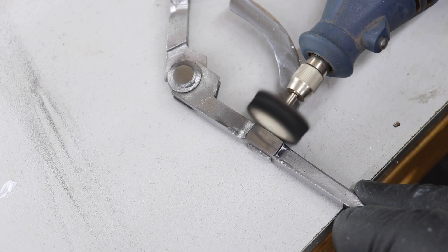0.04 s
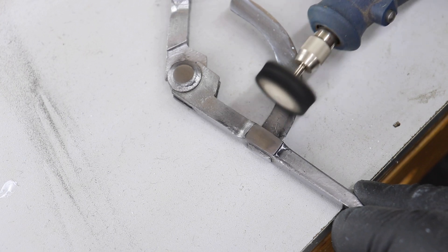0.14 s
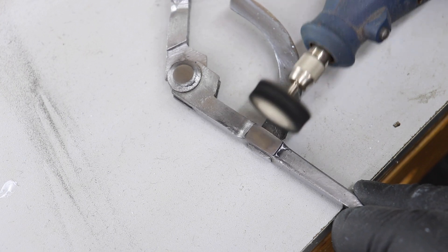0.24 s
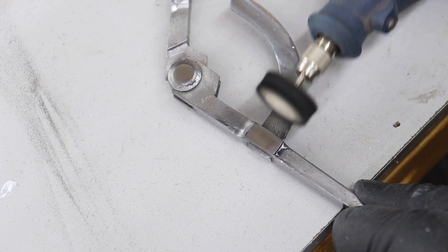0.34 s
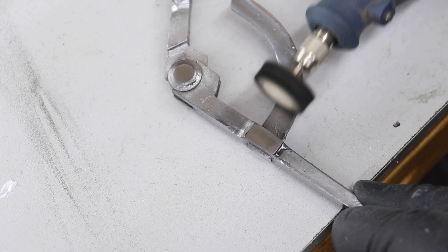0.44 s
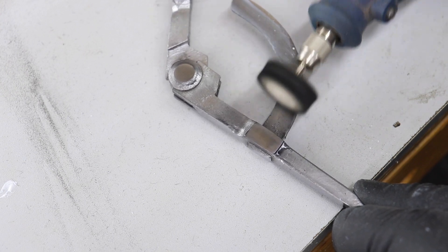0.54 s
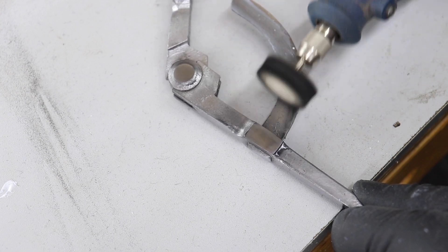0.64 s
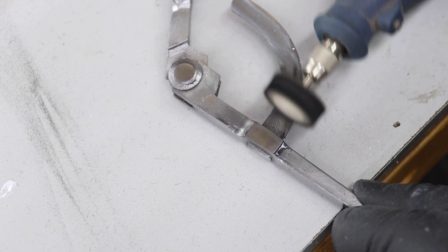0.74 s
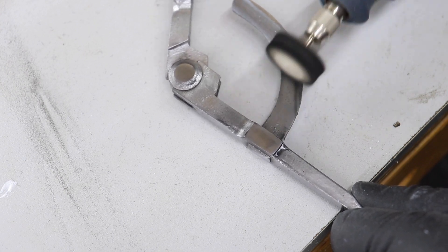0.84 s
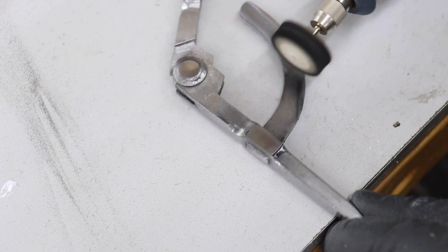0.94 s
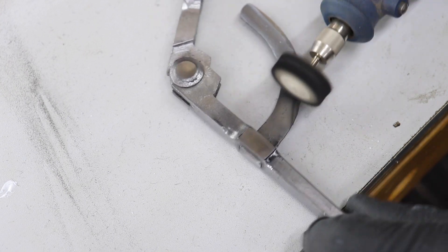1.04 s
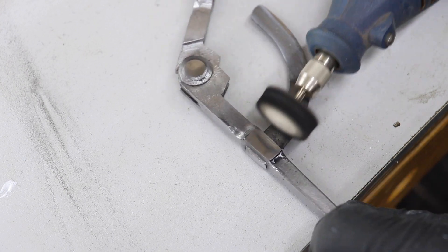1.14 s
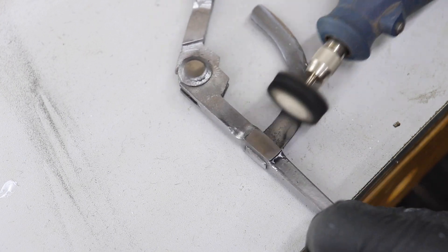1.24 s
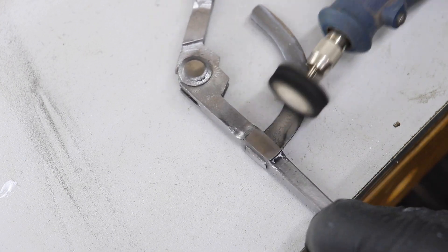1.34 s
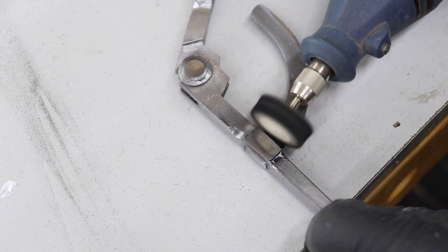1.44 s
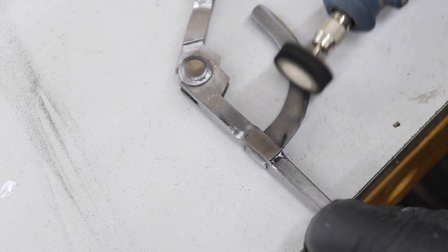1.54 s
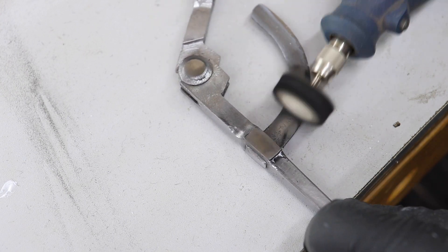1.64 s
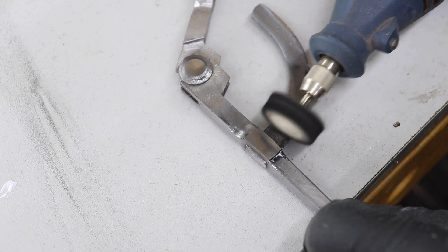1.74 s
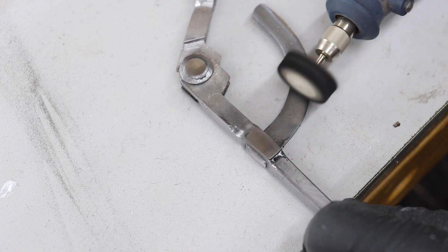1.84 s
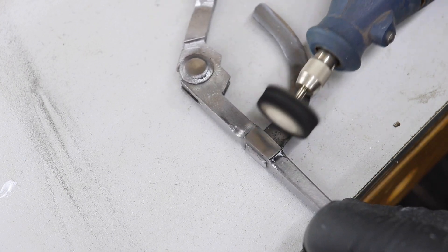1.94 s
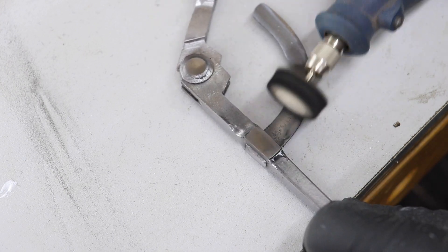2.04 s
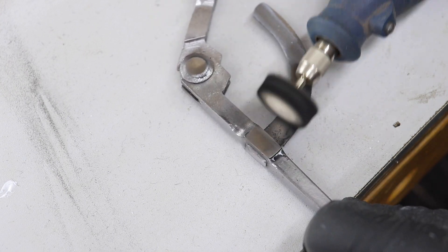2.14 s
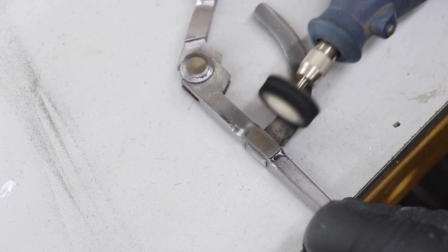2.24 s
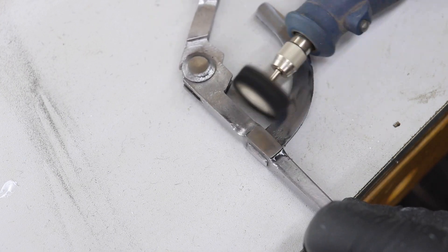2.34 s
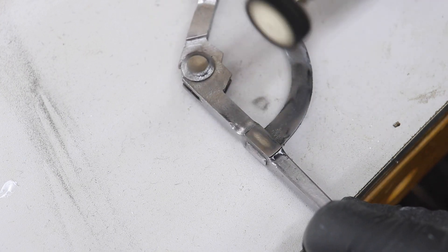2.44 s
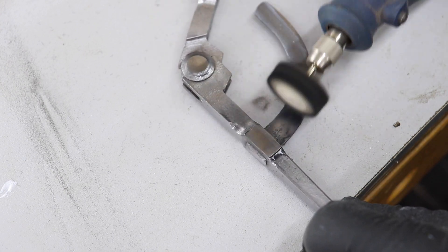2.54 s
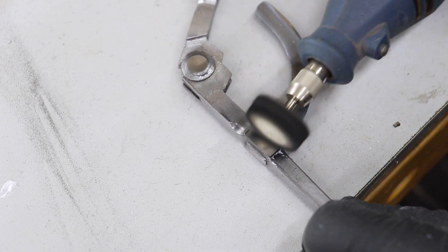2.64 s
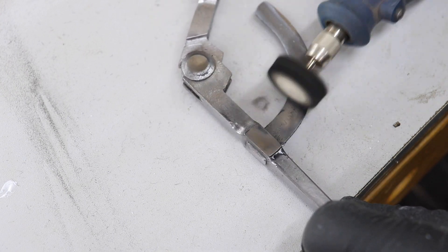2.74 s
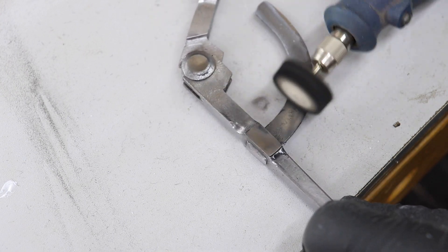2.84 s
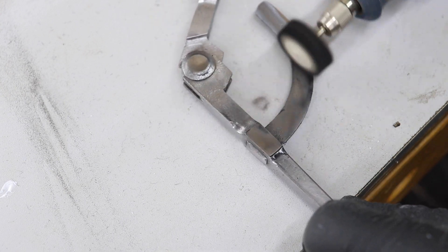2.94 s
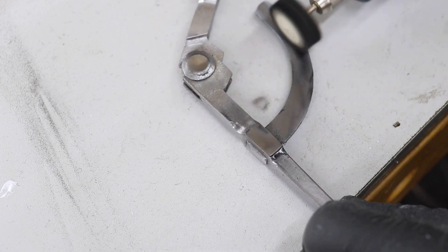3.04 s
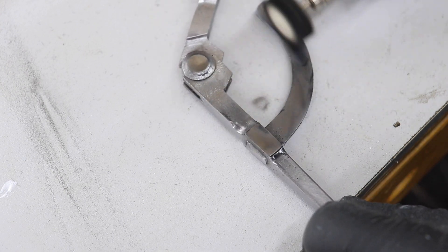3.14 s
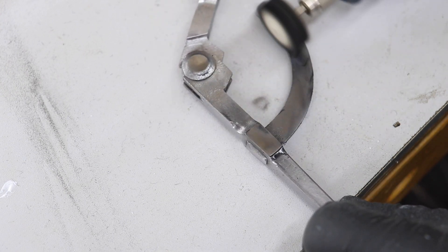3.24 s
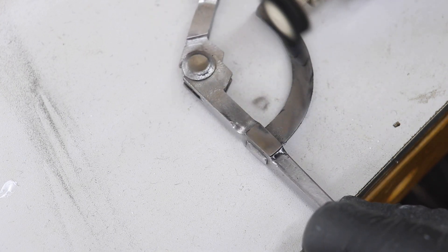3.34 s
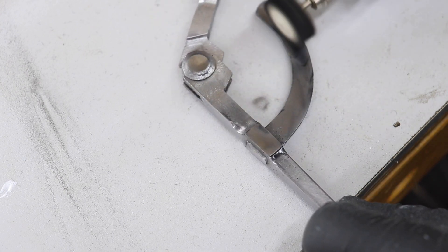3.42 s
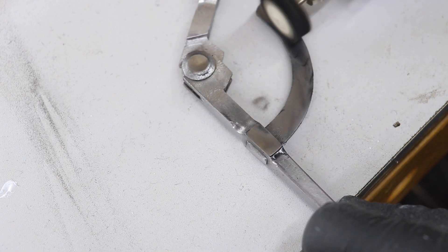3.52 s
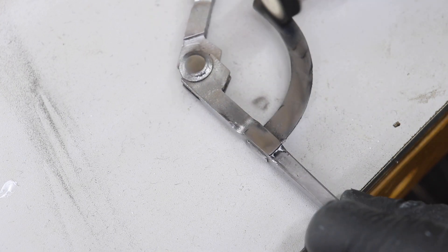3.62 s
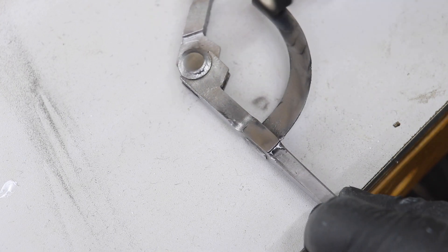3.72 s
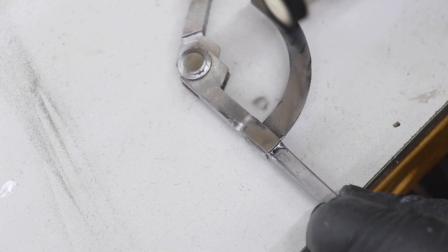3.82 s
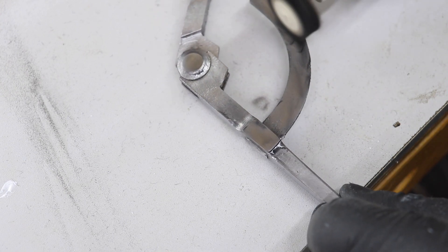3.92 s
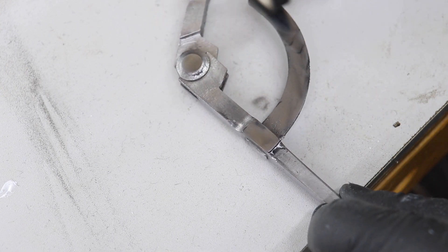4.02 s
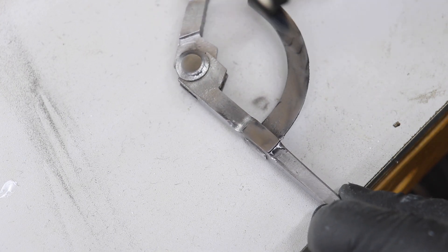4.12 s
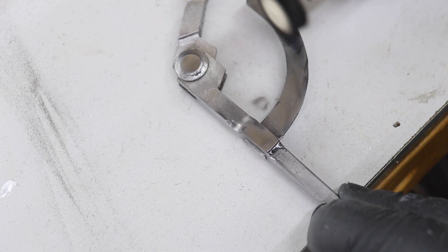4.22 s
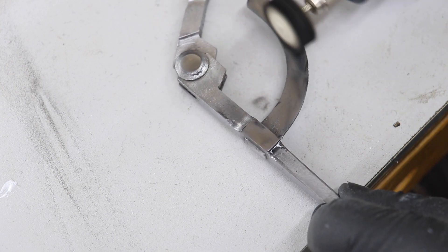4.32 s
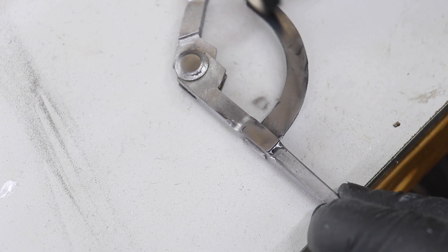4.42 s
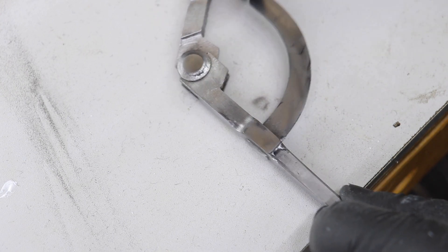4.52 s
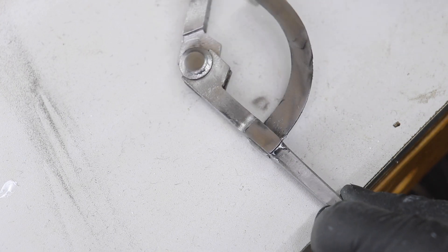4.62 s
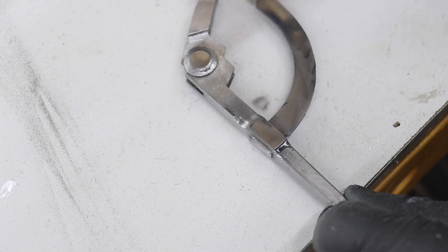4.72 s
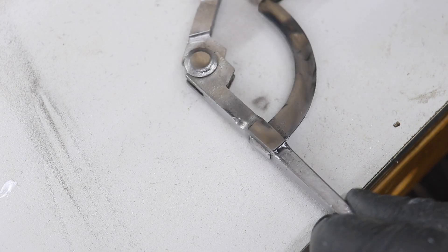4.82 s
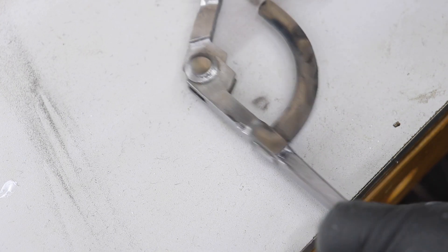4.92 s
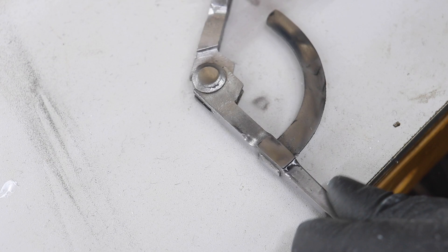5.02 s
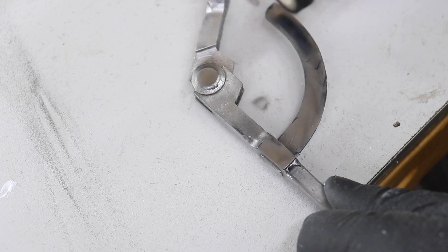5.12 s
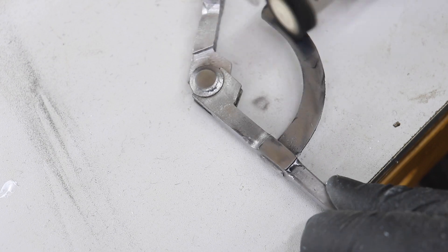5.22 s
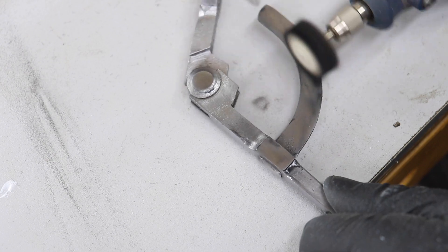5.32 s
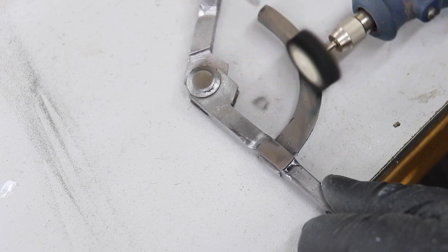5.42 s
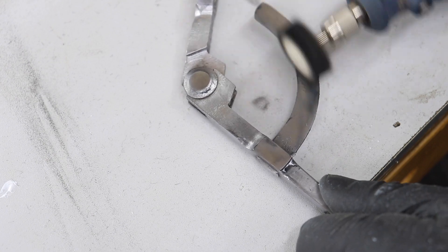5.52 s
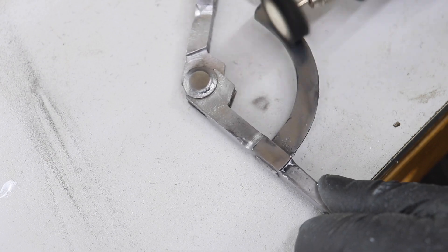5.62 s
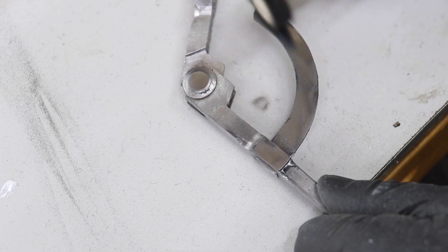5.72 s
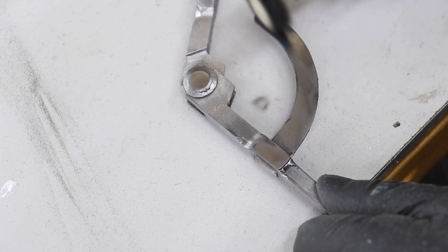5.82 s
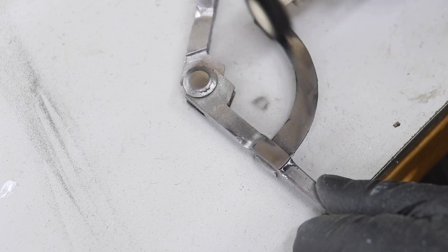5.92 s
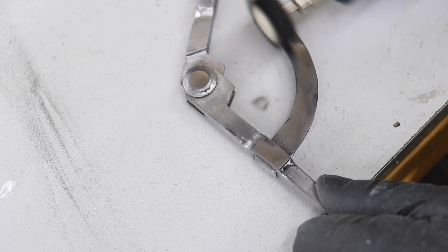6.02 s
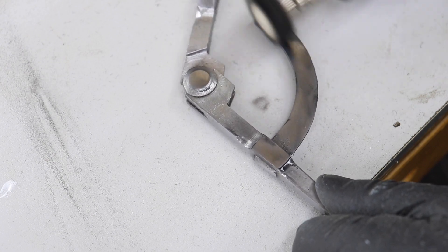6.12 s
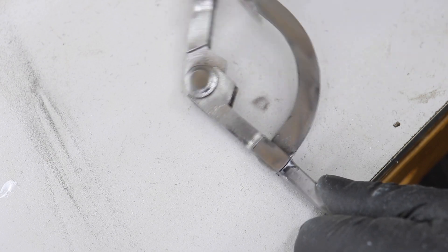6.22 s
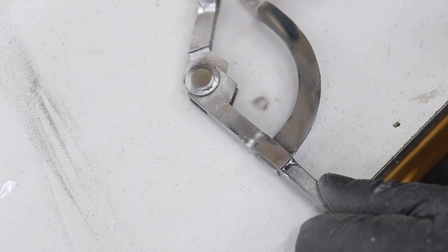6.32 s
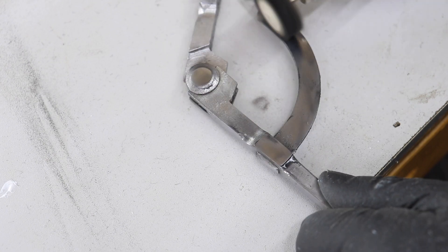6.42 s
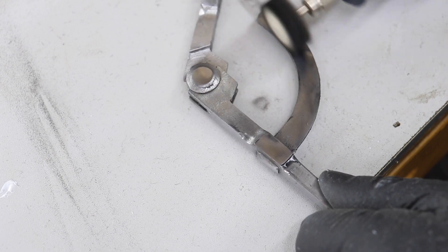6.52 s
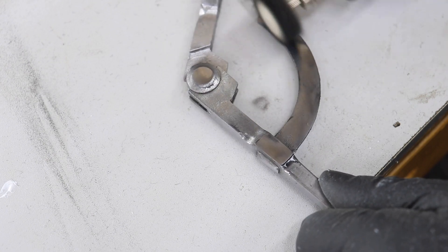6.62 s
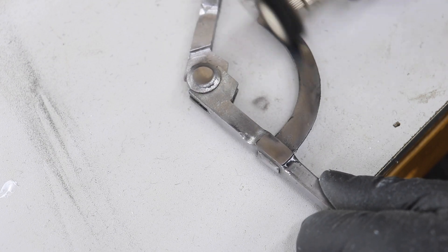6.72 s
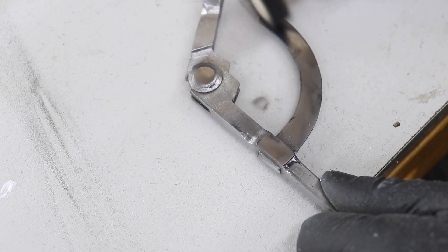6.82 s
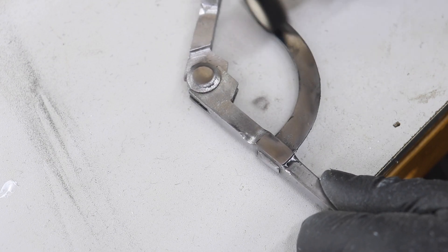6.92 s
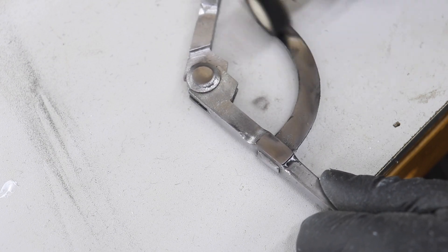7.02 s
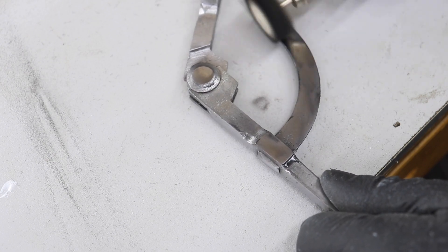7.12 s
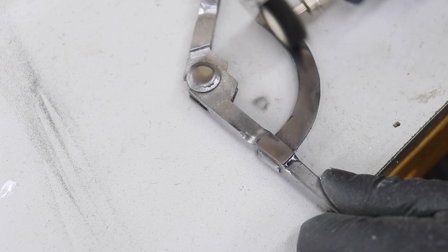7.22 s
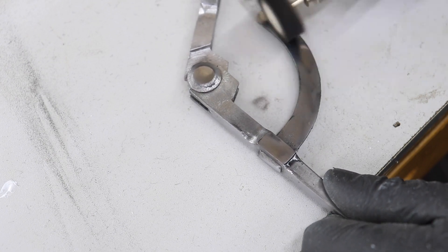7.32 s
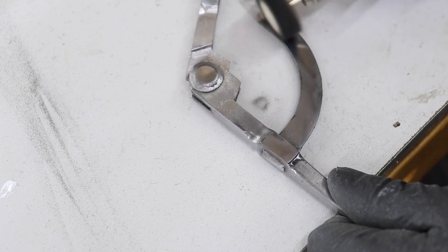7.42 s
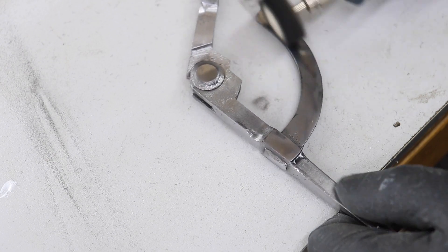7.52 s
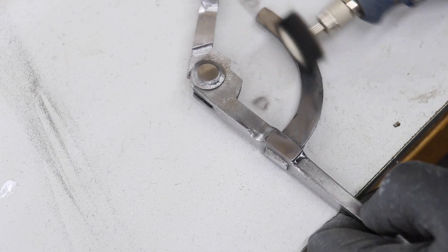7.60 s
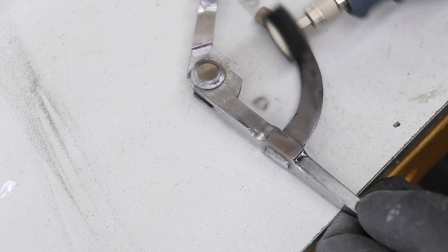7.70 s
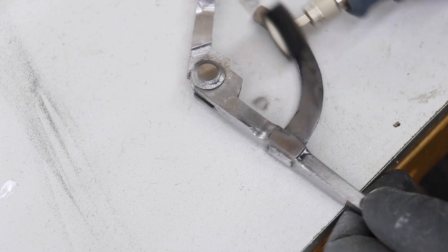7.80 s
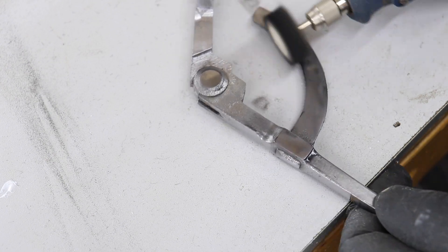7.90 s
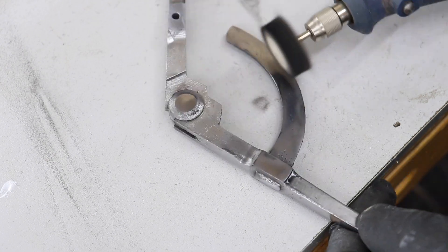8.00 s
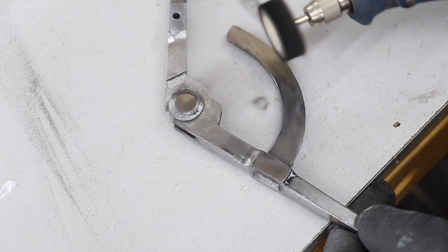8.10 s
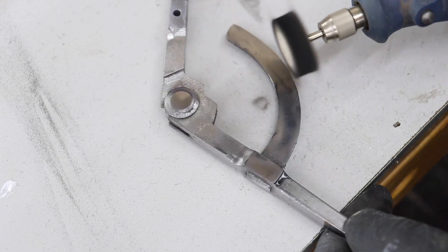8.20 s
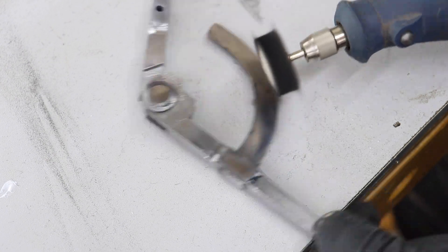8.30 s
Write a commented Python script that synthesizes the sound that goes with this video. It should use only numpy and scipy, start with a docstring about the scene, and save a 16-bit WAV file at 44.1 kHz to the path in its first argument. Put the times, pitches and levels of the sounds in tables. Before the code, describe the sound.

A handheld rotary tool runs close by with a high whine and an airy hiss as its wheel polishes a steel part on a workbench. Each time the wheel is pressed down the pitch sags and the metal buzzes, chatters or briefly squeals. When it lifts, the motor races back up. This happens several times, with a few sharp metal clicks and light knocks of the part against the bench.

```python
"""A rotary tool whines and hisses close by as its wheel polishes a steel part, then races up when lifted.
Pressing slows the shaft: spindle, fan and rotor tones are multiples of its speed, shaped by resonances;
current pulses of the speed control chop the commutator's tone into a buzz. The wheel beats on the part once
a turn; skids and clicks ring struck resonances. Filtered noise makes the air hiss and the mid-band hiss,
which includes rubbing when pressed. Bumps and knocks ring the bench's modes over a faint handling rumble."""
import sys
import numpy as np
from scipy import signal
from scipy.fft import rfft, irfft, next_fast_len
from scipy.io import wavfile
from scipy.ndimage import uniform_filter1d

SR = 44100
rng = np.random.default_rng(int(sys.argv[2]) if len(sys.argv) > 2 else 0)


def materialize(psi):
    """Save the field psi as 16-bit PCM at rate SR to the path in sys.argv[1].

    A 1-D psi becomes a single channel; in a 2-D psi each row is a channel.
    """
    bounded = np.clip(np.atleast_2d(psi).T, -1, 1)
    quanta = np.round(bounded * 32767).astype(np.int16)
    wavfile.write(sys.argv[1], SR, quanta)


N = 368662
TIME = np.arange(N) / SR   # s

PULSE_HZ = 136.5   # current pulses of the speed control
FAN_BLADES, COMMUTATOR_BARS = 19, 8
IRON_HZ = 5963   # resonance of the motor's iron

# the wheel is pressed on the part: [touch t/s, leave t/s, judder of the speed f/Hz, then level/dB of: spindle
# whine, mid-band hiss with friction, fan tone, bench hum, air hiss, the part's tones at 2, 3, 4 and 5 times
# the speed]
PRESSES = [(-0.1, 0.97, 1.5, -21.5, -38, -35.5, -73, -24, -42, -23.5, -28, -48),
           (1.19, 2.457, 2, -20.5, -33, -33, -60.5, -20.5, -42, -35, -33, -38),
           (2.667, 3.719, 1.5, -22, -29, -38, -60.5, -20.5, -46, -29.5, -35.5, -42),
           (3.757, 4.654, 1.5, -21.5, -36.5, -37, -78, -21.5, -40.5, -30, -24, -46),
           (5.331, 6.29, 2, -21, -32, -37, -66, -22, -43.5, -31, -36.5, -40),
           (6.442, 6.951, 3, -23, -29, -44, -66, -22, -48.5, -30, -30.5, -38),
           (6.93, 8.048, 4.5, -22.5, -33, -43, -62.5, -22.5, -37, -31, -33, -32.5)]
# resonances of the part lying on the bench: [f/Hz, width f/Hz, relative level/dB]
PART_MODES = [(412, 560, -8.5), (740, 186, 1.5), (1237, 740, 0), (2070, 500, 8), (2760, 71, 11),
              (3920, 370, 6)]


def from_db(db):
    """Amplitude ratio: 20 dB is a factor of ten."""
    return 10 ** (np.asarray(db) / 20)


def rms_one(x):
    """Normalization to unit root mean square."""
    return x / np.sqrt(np.mean(x ** 2) + 1e-20)


def at_hz(points, hz):
    """Spectral envelope in dB, interpolated on a logarithmic frequency axis."""
    knots, db = np.transpose(points)
    return np.interp(np.log(hz + 1e-9), np.log(knots), db)


def drift(rate):
    """Low-pass filtered chance of spread 1 that changes about rate times a second."""
    step = 40   # samples between the computed points
    r = np.exp(-2 * np.pi * rate * step / SR)
    noise = rng.standard_normal(N // step + 2002)
    slow = signal.lfilter([1], [1, -2 * r, r * r], noise)[2000:]   # past the filter's start
    return np.interp(np.arange(N) / step, np.arange(len(slow)), rms_one(slow))


def swell(s, half_s):
    """Gaussian envelope with top 1."""
    return np.exp(-((TIME - s) / half_s) ** 2)


def held(start, end, attack_s, release_s):
    """Trapezoidal envelope: linear attack, hold at 1, linear release that ends at end."""
    attack = np.clip((TIME - start) / attack_s, 0, 1)
    return attack * np.clip((end - TIME) / release_s, 0, 1)


def coloured(x, spectrum):
    """Spectral shaping: a noise is weighted in the frequency domain, then set to rms 1."""
    size = next_fast_len(N)
    hz = np.arange(size // 2 + 1) * SR / size
    shaped = rfft(x, size) * from_db(at_hz(spectrum, hz))
    return rms_one(irfft(shaped, size)[:N])


def resonate(x, modes):
    """Modal superposition: parallel two-pole resonators with alternating signs."""
    out = 0
    for k, (hz, width, db) in enumerate(modes):
        r = np.exp(-np.pi * width / SR)   # a wider resonance is damped more
        poles = [1, -2 * r * np.cos(2 * np.pi * hz / SR), r * r]
        ring = signal.lfilter([1, 0, -1], poles, x + 1e-18)
        out = out + (-1) ** k * from_db(db) * (1 - r * r) / 2 * ring
    return out


def blows(events, modes, contact_s, grit, level_db):
    """Impact excitation: a push and a short gritty contact ring the modes."""
    out, age = np.zeros(N), TIME[:SR // 4]
    for s, db in events:
        force = grit * rng.standard_normal(len(age)) * np.exp(-age / contact_s)
        force[0] += 1
        ring = resonate(force, modes)
        ring = from_db(db + level_db) * ring / np.abs(ring).max()
        start = round(s * SR)
        out[start:start + len(age)] += ring[:N - start]
    return out


def partial(multiple, angle, speed):
    """Shaft order: a sine of rms 1 locked to the rotation, silent above half the sample rate."""
    phase = multiple * angle + 2 * np.pi * rng.random()
    return np.sqrt(2) * np.sin(phase) * (multiple * speed < SR / 2)


def shaft_speed():
    """Load and inertia: each press drags the shaft down from its speed, then it runs up exponentially."""
    # sag under the hand, one curve for each press: [t/s, turns per second f/Hz]
    sags = [
        [(0.0, 687), (0.46, 668.7), (0.59, 654.4), (0.9, 658.5), (0.945, 671)],
        [(1.21, 830), (1.36, 731), (1.65, 640), (1.79, 641), (1.87, 631), (2.06, 635), (2.25, 615.6),
         (2.45, 603), (2.5, 610)],
        [(2.72, 776), (2.78, 727), (3.01, 688), (3.12, 689), (3.35, 643.6), (3.5, 664.7), (3.6, 654.6),
         (3.675, 660)],
        [(3.81, 739), (3.87, 759), (4.11, 743.5), (4.3, 725.5), (4.41, 722), (4.45, 703), (4.6, 688),
         (4.65, 649), (4.685, 655)],
        [(5.38, 933), (5.45, 880), (5.59, 828), (5.66, 813), (5.7, 791.6), (5.84, 760.5), (6.04, 703),
         (6.25, 688), (6.29, 634), (6.315, 652)],
        [(6.49, 777), (6.62, 762.4), (6.76, 690.7), (6.89, 662), (6.93, 626)],
        [(6.98, 643), (7.15, 629), (7.29, 605), (7.45, 613), (7.63, 605.5), (7.79, 625.6), (7.85, 640.6),
         (7.99, 664), (8.035, 673)],
    ]
    start_hz, free_hz, run_up_s = 690, 961, 0.28   # initial speed, unloaded limit, time constant
    judder_hz = 10
    speed, judder = np.full(N, float(start_hz)), 0
    for (touch, leave, depth, *_), sag in zip(PRESSES, sags):
        first = (touch, np.interp(touch, TIME, speed))
        s, hz = np.transpose([first, *sag])
        after = TIME >= touch
        t = TIME[after]
        run_up = 1 - np.exp(-np.maximum(t - s[-1], 0) / run_up_s)
        speed[after] = np.interp(t, s, hz) + (free_hz - hz[-1]) * run_up
        judder = judder + depth * held(touch, leave, attack_s=0.3, release_s=0.55)
    return speed - judder * np.cos(2 * np.pi * judder_hz * TIME)


def shaft_angle(speed, ripple, jitter):
    """Integrated speed, phase-modulated by torque ripple from the current pulses and a little play."""
    steady = 2 * np.pi * np.cumsum(speed) / SR
    return steady + ripple * np.sin(2 * np.pi * PULSE_HZ * TIME) + jitter * drift(32)


def pressing():
    """Contact loading: levels in dB move from their lifted values to those of each press."""
    # levels with the wheel free: [level/dB of spindle whine, mid-band hiss of the spinning tool, fan tone,
    # bench hum, air hiss, the part's tones at 2, 3, 4 and 5 times the speed]
    lifted = (-35.5, -29, -32.5, -70, -18, -53, -41, -39.5, -42)
    grip_s, release_s = 0.032, 0.038   # the wheel settles on the metal, and comes off it
    levels = np.array(lifted)[:, None]
    for touch, leave, _, *loaded in PRESSES:
        change = np.subtract(loaded, lifted)[:, None]
        levels = levels + change * held(touch, leave, grip_s, release_s)
    return levels


def current_pulses(rise_s, fall_s):
    """Pulsed drive: at a steady rate, each pulse of current swells and dies exponentially. Top 1."""
    age = (TIME * PULSE_HZ + 0.7) % 1 / PULSE_HZ
    pulse = (1 - np.exp(-age / rise_s)) ** 2 * np.exp(-age / fall_s)
    return pulse / pulse.max()


def spindle(angle, speed, whine_db, waver_db, flutter_db, throb):
    """Periodic bearing knocks make shaft orders, which slide through the housing's resonances."""
    # spindle whine: [multiple of the speed, relative level/dB]
    spindle_orders = [(6, -18), (7, -21.5), (8, -12), (9, -13), (10, -13), (11, -9), (12, -13.5), (13, -13),
                      (14, -17), (15, -13), (16, -11), (17, -21), (18, -18), (20, -9), (21, -19), (22, -15),
                      (23, -12), (24, -11), (25, -20), (26, -20)]
    # how well the housing radiates: [f/Hz, relative level/dB]
    housing = [(3700, -7.5), (4100, -1.5), (4450, 6.5), (5000, 2), (5400, -5.5), (6200, -7), (7100, 5),
               (8000, -0.5), (8700, 7), (9700, 9.5), (10500, 5), (12200, -7.5), (13300, -10), (14700, -11)]
    whine = 0
    for k, db in spindle_orders:
        chance_db = waver_db * drift(4.7) + flutter_db * drift(27)
        gain = from_db(db + at_hz(housing, k * speed) + chance_db)
        whine = whine + gain * partial(k, angle, speed)
    return from_db(whine_db) * whine * (1 + throb * np.sin(2 * np.pi * PULSE_HZ * TIME))


def buzz_level(speed, top_db, width_hz, surge_db, floor_db):
    """Resonance: buzz in dB peaks as bar rate meets iron ring, and swells with the current of a run-up."""
    surge_hz_per_s = 1000   # acceleration at which the swell is full
    detuning = (COMMUTATOR_BARS * speed - IRON_HZ) / width_hz
    tuned = from_db(top_db) / np.sqrt(1 + detuning ** 2)
    gaining = uniform_filter1d(np.gradient(speed) * SR, size=4400) / surge_hz_per_s
    return 20 * np.log10(np.hypot(tuned, from_db(floor_db))) + surge_db * np.clip(gaining, 0, 1)


def commutator(angle, speed, current, buzz_db, swing, ring_db, octave_db, steady_db):
    """Amplitude and phase modulation: current chops the bar tone, and sparks ring the motor's iron."""
    jerked = angle + swing * current + 0.016 * drift(56)
    bars = partial(COMMUTATOR_BARS, jerked, speed)
    octave = partial(2 * COMMUTATOR_BARS, jerked, speed)
    # a spark at each pulse's top, and rougher sparking throughout the pulse
    crest = (current > np.roll(current, 1)) & (current >= np.roll(current, -1))
    sparks = 30 * crest * bars + current * (bars + 1.2 * rng.standard_normal(N))
    iron = resonate(resonate(sparks, [(IRON_HZ, 750, 0)]), [(IRON_HZ, 700, 0)])
    iron = iron / np.sqrt(uniform_filter1d(iron ** 2, size=970) + 1e-12)   # even out the loudness
    chopped = from_db(octave_db) * current * octave
    racing = from_db(steady_db) * (speed / speed.max()) ** 6   # the plain tone grows steeply with speed
    return from_db(buzz_db) * (from_db(ring_db) * iron + chopped) + racing * (bars + octave)


def fan(angle, speed, level_db, waver_db):
    """Blade-passing tone: its frequency is the number of blades times the shaft speed."""
    return from_db(level_db + waver_db * drift(14)) * partial(FAN_BLADES, angle, speed)


def rotor(angle, speed, level_db, steepness, waver_db):
    """Slot tones: the rotor stirs the air at shaft orders that follow a power law of speed."""
    # tones of the racing rotor: [multiple of the speed, relative level/dB]
    rotor_orders = [(7, -36), (9, -35), (10, -28), (11, -34), (12, -41), (13, -37), (14, -41), (15, -37),
                    (17, -34), (18, -36), (20, -35)]
    tones = 0
    for k, db in rotor_orders:
        tones = tones + from_db(db + waver_db * drift(9)) * partial(k, angle, speed)
    return from_db(level_db) * (speed / speed.max()) ** steepness * tones


def air(angle, current, level_db, puff, sparking, grain_db):
    """Broadband flow and brush noise, modulated by current pulses and a puff from the vents each turn."""
    # hiss colour: [f/Hz, relative level/dB per Hz]
    air_colour = [(300, -22.5), (600, -24.5), (1000, -19), (1500, -13), (2000, -7), (2500, 5), (3300, -1.5),
                  (4200, -3.5), (5200, 3), (6800, 0.5), (8500, 3.5), (10500, 0.8), (13000, -3),
                  (15500, 4.5)]
    hiss = rng.standard_normal(N) * (1 + sparking * current) * from_db(grain_db * drift(220))
    gusts = 1 + puff * np.cos(angle)
    return gusts * from_db(level_db) * coloured(hiss, air_colour)


def snag_gain():
    """Transient attenuation: the tool's sound dips as the wheel catches on an edge."""
    # catches on an edge: [t/s, half length t/s, depth as level/dB]
    snags = [(0.9, 0.036, 2.5), (1.332, 0.016, 3), (2.455, 0.024, 7.5), (2.765, 0.012, 8), (4.66, .02, 4),
             (5.486, 0.034, 4), (6.294, 0.019, 5), (6.949, 0.019, 1.5)]
    return from_db(-sum(depth_db * swell(s, half_s) for s, half_s, depth_db in snags))


def wheel_tones(angle, speed, tones_db, bounce, hop_phase, flicker, level_db, beat_waver_db,
                wander_db, waver_db, hop_depth, hop_lag):
    """Periodic forcing: a high spot shakes the part each turn; the upper orders cross its resonances."""
    # the once-a-turn beat: [t/s, level/dB]
    beat = [(0.0, -43), (0.92, -55.5), (1.15, -42), (1.3, -58), (1.36, -36), (1.55, -47), (1.65, -37.5),
            (2.1, -41), (2.44, -47), (2.78, -48.5), (2.87, -35), (3.65, -33.5), (3.76, -48), (4.7, -51),
            (5.15, -38), (5.45, -46), (5.66, -36), (5.85, -44.5), (6.45, -48.5), (6.68, -37.5),
            (7.3, -35.5), (7.55, -29), (8.0, -28.5), (8.12, -52), (8.36, -39.5)]
    # the part squeals on one multiple of the speed: [start t/s, end t/s, multiple, level/dB]
    squeals = [(1.6, 1.729, 4, -33), (1.888, 2.042, 4, -32), (2.33, 2.41, 5, -38), (4.35, 4.41, 3, -26.5),
               (4.476, 4.539, 3, -24), (5.549, 5.675, 2, -34.5), (5.834, 5.865, 4, -26),
               (5.839, 5.885, 2, -29.5), (5.96, 6.082, 4, -28), (6.135, 6.182, 4, -30),
               (6.485, 6.64, 4, -31), (6.677, 6.754, 3, -17.5), (6.77, 6.82, 3, -20.5),
               (6.725, 6.919, 2, -28), (6.85, 6.921, 4, -26.5), (7.48, 7.52, 5, -21.5),
               (7.563, 7.715, 5, -32)]
    # how well the part radiates the upper tones: [f/Hz, relative level/dB]
    part_tone = [(1230, -4), (1500, 0.5), (1750, -3), (2000, -2), (2250, -6.5), (2420, -2), (2630, 3),
                 (3050, -5.5), (3300, -6), (3800, -4), (4500, -3)]
    uneven = angle + hop_lag * bounce * np.sin(hop_phase)
    beat_db = np.interp(TIME, *np.transpose(beat)) + beat_waver_db * drift(10)
    out = from_db(beat_db) * partial(1, uneven, speed)
    for k, db in enumerate(tones_db, 2):
        # upper tones come and go as the contact moves
        chance_db = wander_db * np.minimum(drift(6), 0.8) + waver_db * drift(28)
        gain = from_db(db + level_db + at_hz(part_tone, k * speed) + chance_db) * flicker
        for start, end, multiple, squeal_db in squeals:
            if multiple == k:
                gain = gain + from_db(squeal_db) * held(start, end, attack_s=0.0098, release_s=0.012)
        out = out + gain * partial(k, uneven, speed)
    # a hopping wheel hits hardest while it runs fastest
    return out * (1 + hop_depth * bounce * np.cos(hop_phase))


def mid_hiss(angle, level_db, per_turn, grain_db):
    """Modulated noise: mid-band hiss and rubbing swell once a turn with uneven grain."""
    # mid-band colour: [f/Hz, relative level/dB per Hz]
    mid_colour = [(300, -29.5), (600, -9), (1000, -10), (1500, -4), (2000, 5.5), (2500, -2), (3300, -1),
                  (4200, 7), (5200, 9.5), (6800, -70), (8500, -83), (10500, -32), (13000, -46),
                  (15500, -65)]
    strength = (1 + per_turn * np.cos(angle)) * from_db(grain_db * drift(41))
    return from_db(level_db) * coloured(strength * rng.standard_normal(N), mid_colour)


def skidding():
    """Intermittent contact: gain and bounce share of the skids, smoothed over a few milliseconds or more."""
    # the wheel skids and hammers: [start t/s, end t/s, level/dB, share of regular bouncing 0-1]
    skids = [(1.1, 1.15, -25.5, 0), (1.36, 1.406, -31, 0.9), (2.845, 3.11, -29.5, 0.54),
             (3.117, 3.31, -27, 1), (3.299, 3.651, -27, 0.92), (5.314, 5.353, -24.5, 0.23),
             (5.414, 5.425, -22, 0.01), (5.444, 5.473, -24.5, 0.13), (5.501, 5.53, -22.5, 0),
             (5.613, 5.673, -22.5, 0.11), (5.684, 5.714, -24.5, 0.05), (5.794, 5.805, -26.5, 0),
             (5.84, 5.847, -28, 0), (5.934, 5.988, -27, 0.07), (6.034, 6.047, -24, 0.02),
             (6.134, 6.143, -25, 0.02), (6.24, 6.258, -37, 0.06), (6.614, 6.706, -27, 0.2),
             (6.7, 6.916, -28, 0.38), (6.975, 7.043, -21, 0.31), (7.168, 7.274, -24.5, 0.07),
             (7.29, 7.343, -25, 0.14), (7.401, 7.475, -23.5, 0.01), (7.662, 7.753, -25, 0.02),
             (7.765, 7.821, -27, 0.26), (7.848, 7.891, -29, 0.03), (7.968, 7.987, -21, 0)]
    gain, bounce = np.zeros(N), np.zeros(N)
    for start, end, db, share in skids:
        during = slice(round(start * SR), round(end * SR))
        gain[during] = from_db(db)
        bounce[during] = np.clip(share, 0, 1)
    return uniform_filter1d(gain, size=130), uniform_filter1d(bounce, size=900)


def bouncing(rate_hz, wander):
    """Spring-mass oscillation: phase of the wheel hopping on its springy shaft."""
    return 2 * np.pi * np.cumsum(rate_hz * (1 + wander * drift(13.36))) / SR


def hammering(angle, hop, spread_db, slip, hop_db, grit):
    """Repeated impact: uneven strikes about once a turn, with drag between, ring the part; rms near 1."""
    turned = np.maximum.accumulate(angle + slip * drift(300))
    turns = np.floor(turned / (2 * np.pi))
    strength_db = spread_db * np.minimum(rng.standard_normal(N), 1) + hop_db * hop
    strikes = np.diff(turns, prepend=turns[0]) * from_db(strength_db)
    drag = signal.lfilter([1], [1, -0.9], strikes) * rng.standard_normal(N)
    ring = resonate(strikes + grit * drag, PART_MODES)
    return ring / np.sqrt(uniform_filter1d(ring ** 2, size=2600) + 1e-12)


def part_clicks():
    """Impact response: a hard metal contact cracks, then the part rings against wheel and bench."""
    # clicks: [t/s, relative peak level/dB]
    clicks = [(0.989, -3.5), (1.091, -3.5), (1.102, -10), (1.132, -11), (1.189, -11), (1.228, -13),
              (2.449, -6.5), (4.641, -11), (4.85, -6.5), (5.22, -2.5), (5.311, -9), (6.247, -22),
              (6.277, -34), (6.335, -7.5)]
    # first instant, before the ring: [f/Hz, width f/Hz, relative level/dB]
    crack = [(1700, 4200, 0)]
    out = blows(clicks, crack, contact_s=0.00042, grit=0.098, level_db=-0.5)
    return out + blows(clicks, PART_MODES, contact_s=0.0025, grit=0.13, level_db=-1.5)


def workpiece(angle, speed, mid_db, tones_db, rough_skid_db, roughness, skip_db, skip_trim_db):
    """Forced and struck vibration of the part: wheel tones, skids and clicks, with the mid-band hiss."""
    skid, bounce = skidding()
    hop_phase = bouncing(rate_hz=130, wander=0.046)
    # a skidding wheel loses its rhythm
    loose = np.minimum(skid / from_db(rough_skid_db), 1) * (1 - bounce)
    shaken = angle + (0.027 + roughness * loose) * drift(92)
    # at high speed the wheel tones flicker unevenly
    skipping = np.clip((speed - 680) / 80, 0, 1)
    flicker = from_db(skipping * (skip_db * np.minimum(drift(11), 0.7) + skip_trim_db))
    part = wheel_tones(shaken, speed, tones_db, bounce, hop_phase, flicker, level_db=-0.8,
                       beat_waver_db=2.37, wander_db=3.5, waver_db=2.3, hop_depth=0.59, hop_lag=0.28)
    part += from_db(mid_db) * mid_hiss(angle, level_db=-1.83, per_turn=0.61, grain_db=2.5)
    hop = bounce * np.cos(hop_phase)
    part += skid * hammering(angle, hop, spread_db=0.5, slip=0.83, hop_db=3.5, grit=0.14)
    return part + part_clicks()


def bench_knocks():
    """Modal impact: the part knocks on the bench top."""
    # knocks: [t/s, relative peak level/dB]
    knock_times = [(0.988, -18.5), (1.103, -16.5), (2.449, -26), (5.638, -21), (5.662, -34), (5.70, -25),
                   (6.276, -22), (6.336, -24), (6.62, -27)]
    # bench top modes: [f/Hz, width f/Hz, relative level/dB]
    top_modes = [(339, 33, 5), (425, 17, 5), (624, 47, 10)]
    return blows(knock_times, top_modes, contact_s=0.0057, grit=0.061, level_db=-6.0)


def bench_bumps():
    """Modal impact: a long, soft contact of the hands rings the low bench modes."""
    # bumps: [t/s, relative peak level/dB]
    bump_times = [(0.55, -42), (0.942, -34), (2.789, -35), (2.835, -32), (3.729, -42), (3.789, -34.5),
                  (4.584, -35), (4.764, -39), (5.865, -40), (6.109, -47), (6.279, -42), (8.173, -37),
                  (8.219, -44)]
    # bench modes: [f/Hz, width f/Hz, relative level/dB]
    low_modes = [(62, 15, -10), (92, 95, 1), (141, 35, 6.5), (185, 71, -8)]
    return blows(bump_times, low_modes, contact_s=0.018, grit=0.45, level_db=0.5)


def bench(hum_db, shift_db, resting_db, restless_db):
    """Structure-borne sound: hands rumble, faintly even at rest, and the tool hums at its pulse rate."""
    # the hands shift: [t/s, half length t/s, relative level/dB]
    hand_shifts = [(0.0, .07, -50), (0.19, 0.032, -48), (0.593, 0.073, -58), (0.8, 0.032, -58),
                   (1.054, 0.23, -55), (2.85, 0.064, -53), (3.446, 0.091, -50.5), (3.76, 0.11, -45),
                   (4.104, 0.051, -47), (4.521, 0.21, -46), (5.4, .03, -50), (5.8, 0.19, -51),
                   (6.049, 0.097, -47), (6.748, .05, -59), (7.378, 0.039, -55), (7.898, 0.037, -58),
                   (8.22, 0.077, -38)]
    # rumble colour: [f/Hz, relative level/dB per Hz]
    rumble_colour = [(20, -3), (55, 10), (100, 1), (200, -14.5), (400, -23), (800, -38)]
    shifts = sum(from_db(db + shift_db) * swell(s, half_s) for s, half_s, db in hand_shifts)
    handling = (shifts + from_db(resting_db)) * from_db(restless_db * drift(24))
    rumble = handling * coloured(rng.standard_normal(N), rumble_colour)
    cycle = 2 * np.pi * PULSE_HZ * TIME
    return rumble + from_db(hum_db) * (np.sin(cycle) + 0.54 * np.sin(2 * cycle))


def scene():
    """Superposition of tool, part and bench, identical in both channels."""
    speed = shaft_speed()
    whine_db, mid_db, fan_db, hum_db, air_db, *tones_db = pressing()
    angle = shaft_angle(speed, ripple=0.033, jitter=0.034)
    current = current_pulses(rise_s=0.001, fall_s=0.001)
    buzz_db = buzz_level(speed, top_db=-29.5, width_hz=330, surge_db=7.0, floor_db=-55.0)
    tool = spindle(angle, speed, whine_db + 0.96, waver_db=1.5, flutter_db=1.99, throb=0.14)
    tool += commutator(angle, speed, current, buzz_db, swing=0.086, ring_db=1.5, octave_db=1.5,
                       steady_db=-26.5)
    tool += fan(angle, speed, fan_db + 5.5, waver_db=1.86)
    tool += rotor(angle, speed, level_db=-1.5, steepness=6.8, waver_db=5.5)
    tool += air(angle, current, air_db + 1.2 * drift(7.2), puff=0.26, sparking=0.069, grain_db=1.2)
    tool *= snag_gain()
    part = workpiece(angle, speed, mid_db, tones_db, rough_skid_db=-40.0, roughness=0.074,
                     skip_db=8.5, skip_trim_db=0.5)
    low = bench_knocks() + bench_bumps()
    low += bench(hum_db, shift_db=-5.0, resting_db=-78.0, restless_db=8.5)
    return np.tile(tool + part + low, (2, 1))


def record(dry):
    """Band limitation: a steep elliptic low-pass removes the top."""
    cutoff_hz = 15750
    low_pass = signal.ellip(12, 0.1, 80, cutoff_hz, fs=SR, output="sos")   # ripple and stop band in dB
    return signal.sosfilt(low_pass, dry)


dry = scene()
out = record(dry)
materialize(out)
```